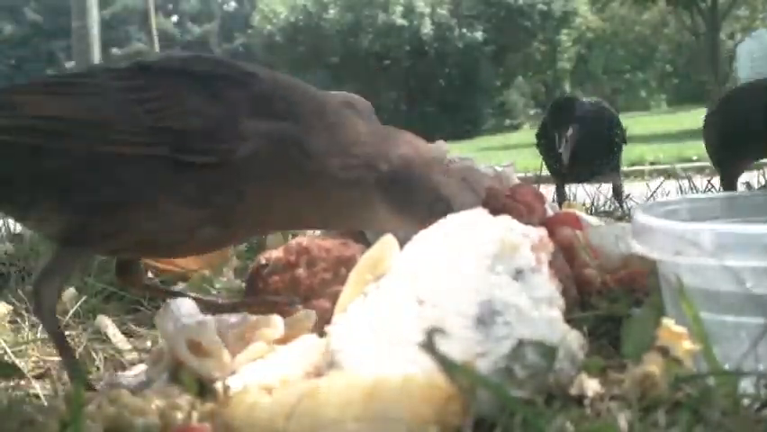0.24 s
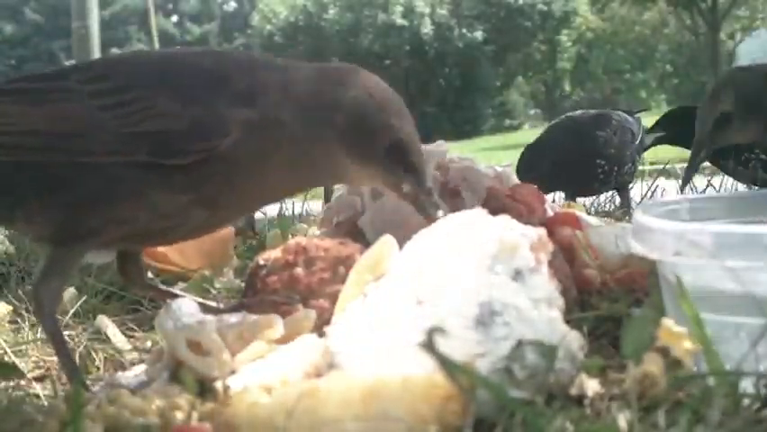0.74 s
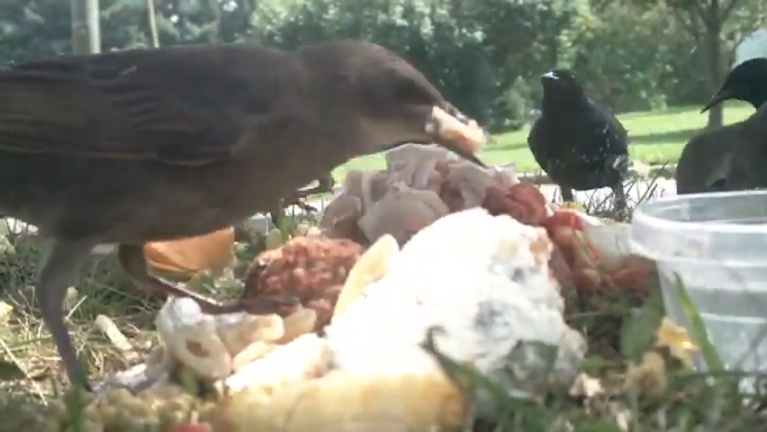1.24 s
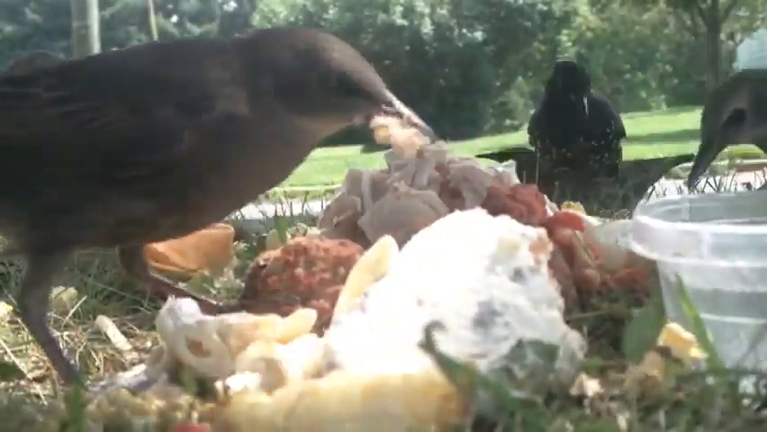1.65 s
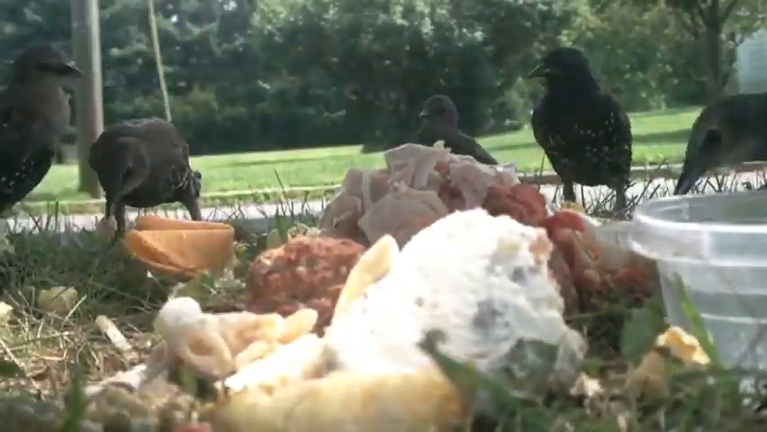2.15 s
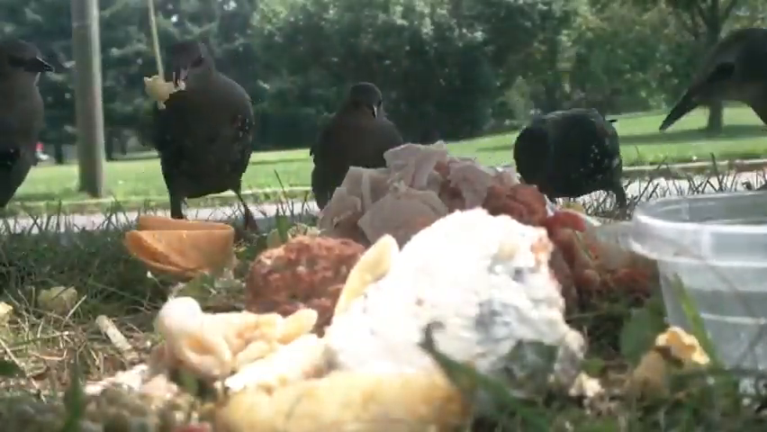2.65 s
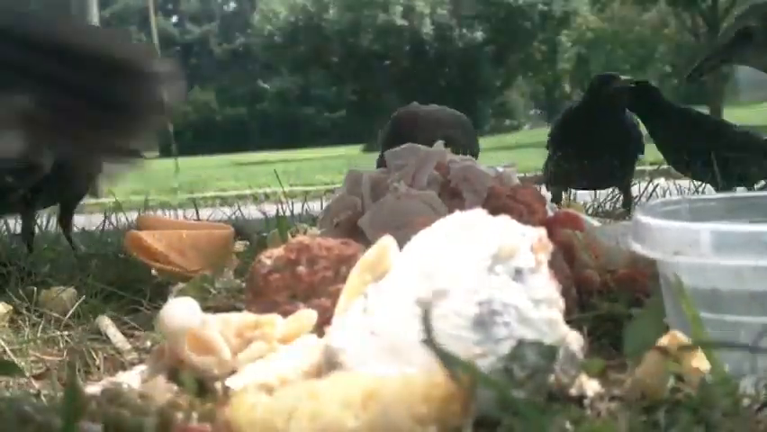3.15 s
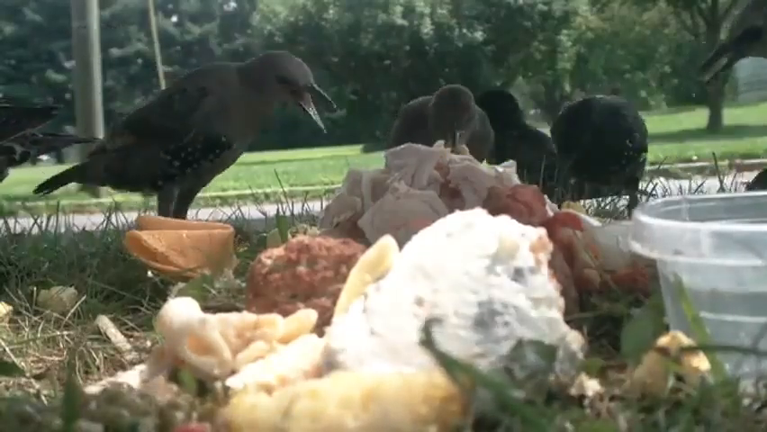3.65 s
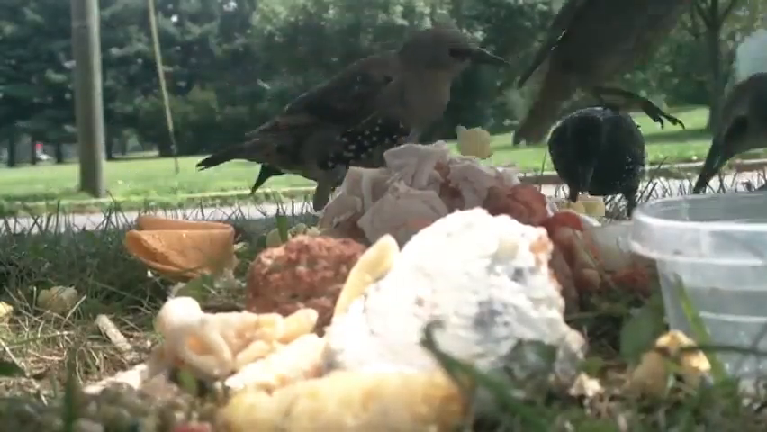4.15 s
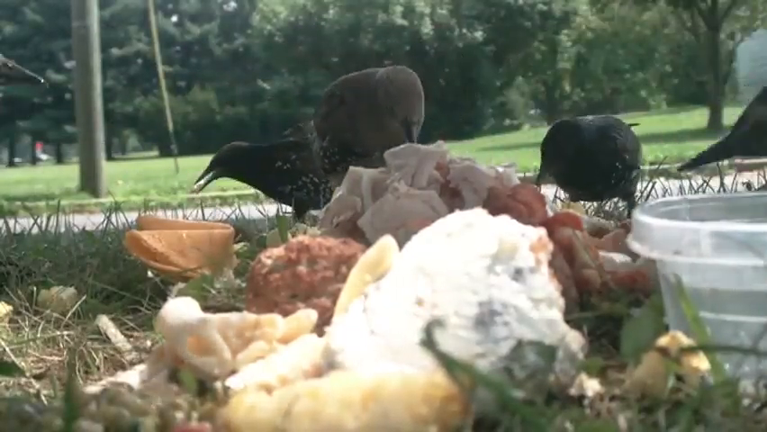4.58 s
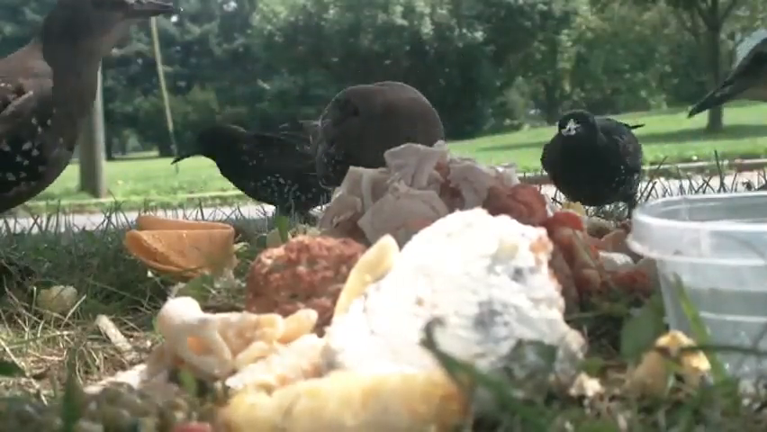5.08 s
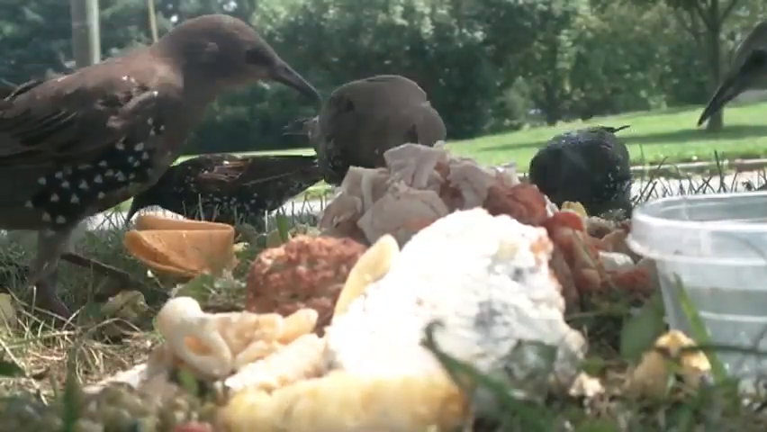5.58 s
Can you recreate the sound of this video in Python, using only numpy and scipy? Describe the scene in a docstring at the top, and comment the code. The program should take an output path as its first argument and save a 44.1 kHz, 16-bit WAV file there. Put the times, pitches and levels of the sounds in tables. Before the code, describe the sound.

Low outdoor rumble, blustery wingbeats buffeting the microphone, then raspy bird squawks with snapping clicks, followed by softer churrs farther away.

```python
"""On a lawn, right in front of a small camera lying in the grass, starlings squabble over scraps.
Near birds squawk with two warbling voices and a rattle, one hisses, and bills snap as short rings and cracks.
Others further off churr on duller voices, and thin whistles glide in the distance.
Wing strokes and gusts blow on the microphone, feathers and grass rustle as uneven noise, and birds leave
short tails of scattered sound. Steady noise, strongest in the bass, is the open air."""
import sys
import numpy as np
from scipy import signal
from scipy.fft import rfft, irfft, next_fast_len
from scipy.io import wavfile
from scipy.ndimage import uniform_filter1d, map_coordinates

SR = 44100
rng = np.random.default_rng(int(sys.argv[2]) if len(sys.argv) > 2 else 0)


def inscribe(sig):
    """Save sig as 16-bit PCM at rate SR to the path in sys.argv[1].

    A 1-D sig is mono; a 2-D sig holds one channel per row.
    Samples are clipped to [-1, 1] before scaling.
    """
    pcm = np.round(np.clip(np.atleast_2d(sig).T, -1, 1) * 32767)
    wavfile.write(sys.argv[1], SR, pcm.astype(np.int16))


N = 256662
TIME = np.arange(N) / SR


def from_db(db):
    """Decibels to an amplitude factor."""
    return 10 ** (np.asarray(db) / 20)


def rms_one(x):
    """Scale to an overall rms of 1."""
    return x / np.sqrt(np.mean(x ** 2) + 1e-20)


def even(x):
    """Hold the short-term level at 1."""
    return x / np.sqrt(np.maximum(uniform_filter1d(x ** 2, size=300), 1e-12))


def at_hz(points, hz):
    """Read a curve on a log-frequency axis."""
    f, value = np.transpose(points)
    return np.interp(np.log(hz + 1e-9), np.log(f), value)


def colour(x, spectrum):
    """Filter by a smooth spectrum of (hz, gain_db) points."""
    size = next_fast_len(x.shape[-1] + SR // 10, real=True)
    gain = from_db(at_hz(spectrum, np.fft.rfftfreq(size, 1 / SR)))
    return irfft(rfft(x, size) * gain, size)[..., :x.shape[-1]]


def drift(rate, size):
    """Smooth chance of spread about 1, with a fresh random point rate times a second."""
    knots = rng.standard_normal(8000)
    return map_coordinates(knots, [np.arange(size) * rate / SR], order=2, mode="wrap")


def envelope(t, attack_s, fade_db, release_s):
    """A call opens, sags ever faster as the air runs out, and closes; a negative fade swells."""
    gate = np.clip(t / attack_s, 0, 1) * np.clip((t[-1] - t) / release_s, 0, 1)
    return gate * from_db(-fade_db * (t / t[-1]) ** 1.88)


def puff(s, swell_s):
    """A push of air peaks after swell_s and dies away a few times more slowly."""
    u = np.clip((TIME - s) / swell_s, 0, 20)
    return u * np.exp(1 - u)


PORT_SPACING_M = 0.018


def placed(x, s, degrees):
    """A sound that starts at s; from the right it reaches the left port later."""
    lag = PORT_SPACING_M * np.sin(np.radians(degrees)) / 343 * SR   # in samples; sound travels 343 m/s
    out, start = np.zeros((2, N + SR)), round(s * SR)
    left = map_coordinates(x, [np.arange(len(x)) - lag], order=3)
    out[:, start:start + len(x)] = left, x
    return out[:, :N]


def at_ports(x):
    """Each port tints the sound, the right one duller around 6.5 kHz."""
    left = colour(x[0], [(3000, 0.034), (6500, 0.41), (9000, 1.7)])
    right = colour(x[1], [(3000, -0.5), (6500, -3.0), (9000, 1.3)])
    return np.array([left, right])


# How alike the two ports hear sound from all around: hz [Hz], likeness [correlation, 1 = identical]
PORT_LIKENESS = [(30, 0.95), (80, 0.86), (250, 0.85), (600, 0.66), (1500, 0.65), (4000, 0.11),
                 (9000, 0.029), (15000, 0.03)]


def diffuse_noise(spectrum):
    """Stereo noise from all around, less alike between the ports in the treble; rms 1."""
    alike = np.clip(at_hz(PORT_LIKENESS, np.fft.rfftfreq(N, 1 / SR)), -1, 1)
    mid, side = rfft(rng.standard_normal((2, N)))
    shared, opposed = np.sqrt(1 + alike) * mid, np.sqrt(1 - alike) * side * [[1], [-1]]
    return rms_one(colour(irfft(shared + opposed, N), spectrum))


# Colour of the open air, a low rumble under faint hiss: hz [Hz], gain_db [dB]
AIR_COLOUR = [(12, -8), (20, -3), (53, 1), (112, -5), (140, -8), (161, -11), (225, -14.5), (342, -19),
              (427, -22.5), (465, -23), (1100, -30.5), (1580, -32), (2760, -36.5), (3960, -38),
              (15500, -40.5)]
AIR_DB = -36.5


def open_air():
    """Steady diffuse noise rumbles low, a touch louder on the left."""
    return from_db(AIR_DB) * diffuse_noise(AIR_COLOUR) * from_db([[.5], [-.5]])


def garden(x, wet_db, t60):
    """Ground, tub and trees scatter a faint short tail, different at each port."""
    t = np.arange(SR // 2) / SR
    decay = from_db(-60 * t / t60) * (t > .002)   # nothing returns in the first 2 ms
    tail = colour(rng.standard_normal((2, len(t))), [(1000, -2), (5000, 10), (12000, -7.0)]) * decay
    tail = tail / np.sqrt(np.sum(tail ** 2) / 2)
    return from_db(wet_db) * signal.fftconvolve(x[None], tail, axes=1)[:, :N]


# Bouts of feathers and grass brushing: middle_s [s], half_length_s [s], level_db [dB]
BRUSH_BOUTS = [(.02, 0.16, -51.5), (0.716, 0.015, -45), (1.056, 0.24, -48.5), (1.3, 0.12, -44),
               (1.95, 0.57, -50), (3.024, 0.11, -38.5), (3.145, 0.013, -38), (3.45, 0.79, -53),
               (5.8, .3, -51)]
# Colour of brushing feathers and grass: hz [Hz], gain_db [dB]
FEATHER_COLOUR = [(200, 7), (400, 9.5), (800, 0), (1500, -3.5), (3000, -0.5), (6000, -4), (10000, -2),
                  (14000, -4), (16000, -6.5)]
STIRRING_DB = -56   # the flock is never quite still


def rustle(grain_db):
    """Feathers and grass blades brush in tiny uneven bursts; each bout swells and fades."""
    power = from_db(STIRRING_DB) ** 2
    for s, half, level_db in BRUSH_BOUTS:
        power = power + from_db(level_db) ** 2 * np.exp(-2 * ((TIME - s) / half) ** 2)
    noise = diffuse_noise(FEATHER_COLOUR)
    grain = rms_one(from_db(grain_db * drift(500, N) + drift(50, N)))
    return np.sqrt(power) * noise * grain


# Quick flicks of head and feathers: start_s [s], level_db [dB]
FEATHER_FLICKS = [(1.118, -36.5), (1.135, -37.5), (1.186, -34), (1.206, -37), (1.247, -32.5),
                  (1.273, -39.5), (1.311, -33), (1.375, -37), (2.958, -38), (2.973, -31), (2.983, -33.5)]
# Dull colour of a flick: hz [Hz], gain_db [dB]
FLICK_COLOUR = [(100, 3), (300, 10), (700, 2), (1200, -14.5), (3000, -10), (8000, -24), (15000, -40)]


def flicks(swell_s):
    """Short puffs of dull noise swell and die within some milliseconds."""
    level = sum(from_db(level_db) * puff(s, swell_s) for s, level_db in FEATHER_FLICKS)
    return level * diffuse_noise(FLICK_COLOUR)


# Gusts of turbulent air behind the wings: start_s [s], swell_s [s], level_db [dB], eddy_hz [Hz]
WING_GUSTS = [(.98, 0.031, -26, 83), (1.15, 0.066, -30.5, 225), (1.28, 0.017, -27, 207),
              (1.36, 0.017, -27.5, 140), (1.7, 0.02, -9.5, 243), (1.775, 0.019, -8.5, 218),
              (1.835, 0.016, -9.5, 162), (1.917, 0.01, -13, 135), (1.95, 0.027, -27.5, 95.5),
              (2.04, 0.056, -23.5, 72), (2.87, 0.1, -29, 110), (3.122, 0.011, -16.5, 211),
              (3.175, 0.016, -20.5, 85), (3.47, 0.023, -31.5, 60), (5.6, 0.13, -41.5, 200)]


def airflow():
    """Gusts add up in power, and the stronger ones weigh more in the eddy rate: (strength, eddy Hz)."""
    powers = np.array([(from_db(level_db) * puff(s, swell_s)) ** 2 + 1e-16
                       for s, swell_s, level_db, _ in WING_GUSTS])
    total = powers.sum(axis=0)
    return np.sqrt(total), np.array(WING_GUSTS)[:, -1] @ powers / total


def draught(steepness, rise, shared):
    """Eddies buffet each port as bands of low noise that weaken above the moving eddy rate."""
    strength, eddy_hz = airflow()
    out, edges = 0, 22 * 2 ** np.arange(0, 6.5, .66)
    for low, high in zip(edges, edges[1:]):
        white = rng.standard_normal((2, N)) + shared * rng.standard_normal(N)
        band = signal.sosfilt(signal.butter(2, [low, high], "band", fs=SR, output="sos"), white)
        ratio = np.sqrt(low * high) / eddy_hz
        out = out + rms_one(band) * ratio ** rise / np.sqrt(1 + ratio ** steepness)
    out = signal.sosfilt(signal.butter(2, 450, fs=SR, output="sos"), out)
    return strength * out / np.sqrt(uniform_filter1d(np.mean(out ** 2, axis=0), size=1200))


# Wing strokes that push air on the microphone: middle_s [s], peak_db [dB],
# half_length_s [s, from the middle to either peak]
WING_STROKES = [(1.003, -25.5, 0.013), (2.089, -20.5, 0.0053), (2.929, -16, 0.0067), (3.006, -10, 0.0053),
                (3.084, -9.5, 0.0062), (3.163, -6.5, 0.0047)]


def wing_strokes():
    """A passing wing draws the air away and then pushes it back."""
    out = np.zeros(N)
    for s, peak_db, half in WING_STROKES:
        u = np.clip((TIME - s) / half, -10, 10)
        out += from_db(peak_db) * u * np.exp((1 - u * u) / 2)
    return out


# Thin distant whistles: start_s [s], length_s [s], start_hz [Hz], end_hz [Hz], level_db [dB]
THIN_WHISTLES = [(2.503, .18, 4150, 4130, -58), (4.286, 0.2, 4150, 4110, -60),
                 (4.658, .1, 1595, 1480, -54.5), (5.203, 0.11, 5240, 4930, -47),
                 (5.246, 0.19, 5050, 4730, -56)]


def whistles():
    """Thin gliding sines swell, waver and fade."""
    out = np.zeros(N)
    for s, length, start_hz, end_hz, level_db in THIN_WHISTLES:
        span = (TIME >= s) & (TIME < s + length)
        along = (TIME[span] - s) / length
        hz = (start_hz + (end_hz - start_hz) * along) * (1 + 0.012 * drift(283, len(along)))
        level = from_db(level_db + 1.5 * drift(37, len(along))) * np.sin(np.pi * along)
        out[span] += level * np.sin(2 * np.pi * np.cumsum(hz) / SR)
    return out


def membrane(hz, slope_db):
    """One side of the syrinx: twelve harmonics that change by slope_db an octave."""
    k = np.arange(1, 13)[:, None]
    phase = 2 * np.pi * np.cumsum(hz) / SR
    level = from_db(slope_db * np.log2(k)) * (k * hz < SR / 2)
    return np.sum(level * np.sin(k * phase), axis=0)


def rattle(size, per_s, scatter, air):
    """Slack membranes slap at uneven intervals, with a little air rushing between the slaps."""
    turns = np.cumsum(per_s * np.exp(scatter * drift(900, size))) / SR
    slaps = np.diff(np.floor(turns), prepend=0) * from_db(3.5 * rng.standard_normal(size))
    return rms_one(slaps) + air * rng.standard_normal(size)


def call(upper_hz, lower_hz, rasp, throat, warble_hz, warble, throb_db, jitter, lower_db, slope_db, tilt_db=0):
    """Two warbling voices and a rattle share one throat; less rasp means less rattle and more tone."""
    size, rasp = len(upper_hz), np.clip(rasp, 0, 1)
    # an open bill facing this way is brighter
    throat = [(hz, db + tilt_db * np.log2(hz)) for hz, db in throat]
    swing = np.sin(2 * np.pi * np.cumsum(warble_hz * (1 + 0.111 * drift(40.2, size))) / SR)
    upper_bend = warble * swing + jitter * (0.43 + rasp) * drift(691, size)
    upper = membrane(upper_hz * (1 + upper_bend), slope_db)
    lower_bend = warble * swing * (1 - rasp) + jitter * (0.49 + rasp) * drift(704, size)
    lower = membrane(lower_hz * (1 + lower_bend), slope_db + 2)
    # the slack side comes and goes, and rests in pure notes
    lower = lower * from_db(lower_db + 3.6 * drift(119.3, size)) * np.tanh(3 * rasp)
    tone = even(colour(upper + lower, throat)) * from_db(2.04 * drift(303.7, size))
    noise = even(colour(rattle(size, per_s=750, scatter=.35, air=0.85), throat))
    mix = np.sqrt(1 - rasp) * tone + np.sqrt(rasp) * noise
    return from_db(throb_db * swing) * mix   # louder at the top of each warble


# Churrs further off: start_s [s], length_s [s], from_hz [Hz], to_hz [Hz],
# lower_share [lower pitch / upper pitch], level_db [dB], fade_db [dB], rasp [0-1]
FAR_CHURRS = [ (1.926, 0.18, 2553, 2470, 0.93, -45.5, -0.5, 0.16),
              (2.924, 0.2, 1850, 2822, 0.79, -37.5, 8.5, 0.43),
              (3.153, 0.084, 1046, 2310, .63, -36, 16.5, 0.5),
              (3.215, 0.15, 2450, 2580, 0.66, -41.5, 20, 0.8),
              (4.434, .195, 2467, 2040, .62, -37.5, 7.5, .22),
              (5.013, 0.21, 1738, 2840, 0.77, -35, 11.5, 0.33),
              (5.455, 0.16, 848, 2697, 0.56, -48, -2, 0.5), (5.674, 0.15, 1890, 3050, .83, -43.5, 1, 0.72)]
# Colour of the far throats: hz [Hz], gain_db [dB]
FAR_THROAT_COLOUR = [(300, -52), (700, -9), (1400, 1.5), (2300, 3.5), (3000, 1), (4000, -7), (6000, -11),
                     (12000, -20)]
CHURR_ATTACK_S, CHURR_RELEASE_S, FAR_DEGREES = 0.05, 0.022, 28
CHURR_ARCH = .05   # a churr bows upward in the middle by this share of its pitch
CHURR_SETTLE, SETTLE_BEND = .65, 4   # towards its end it loses this share of its warble and rasp


def far_birds():
    """Duller churrs with a slow wide warble; each glides in a low arch and settles into a plainer note."""
    out = 0
    for s, length, from_hz, to_hz, lower_share, level_db, fade_db, rasp in FAR_CHURRS:
        t = np.arange(round(length * SR)) / SR
        hz = np.linspace(from_hz, to_hz, len(t)) * (1 + CHURR_ARCH * np.sin(np.pi * t / length))
        unrest = 1 - CHURR_SETTLE * (t / length) ** SETTLE_BEND
        voice = call(hz, lower_share * hz, rasp * unrest, FAR_THROAT_COLOUR, warble_hz=59.75,
                     warble=0.151 * unrest, throb_db=0.5, jitter=0.029, lower_db=0.0, slope_db=-30)
        shape = from_db(level_db) * envelope(t, CHURR_ATTACK_S, fade_db, CHURR_RELEASE_S)
        out = out + placed(shape * voice, s, FAR_DEGREES)
    return out


# Colour of the hoarse hiss: hz [Hz], gain_db [dB]
HOARSE_COLOUR = [(290, -45), (500, -18), (674, 0.5), (1540, -8), (4470, 0.5), (6760, -3.5), (7790, -9),
                 (9380, -7), (13600, -27), (15000, -32)]
HISS_S, HISS_LENGTH_S, HISS_ATTACK_S, HISS_RELEASE_S = 2.902, 0.059, 0.013, 0.013
HISS_DB, HISS_FADE_DB, HISS_DEGREES = -27.5, 3.5, 24


def hiss():
    """One bird's hoarse hiss: rattle and air without a tone."""
    t = np.arange(round(HISS_LENGTH_S * SR)) / SR
    noise = rms_one(colour(rattle(len(t), per_s=500, scatter=.4, air=0.7), HOARSE_COLOUR))
    shape = from_db(HISS_DB) * envelope(t, HISS_ATTACK_S, HISS_FADE_DB, HISS_RELEASE_S)
    return placed(shape * noise, HISS_S, HISS_DEGREES)


# Sharp snaps of bill and throat: start_s [s], level_db [dB], ring_hz [Hz]
BILL_SNAPS = [(0.1424, -6.5, 6600), (.354, -35.5, 2200), (.716, -35, 6100), (1.785, -40, 2900),
              (2.2081, -25, 5500), (2.305, -3.5, 6100), (2.367, 2, 6400), (2.3747, -7, 6000),
              (2.4411, 0.5, 5600), (2.703, -29.5, 12000), (2.745, -31, 11000), (2.982, -30, 3000),
              (3.526, -8.5, 4950), (3.6002, -4.5, 5830), (3.671, -15.5, 6300), (3.6752, -11.5, 6240),
              (3.681, -11, 5900), (3.6874, -3.5, 6400), (3.9298, -6, 5300), (3.9347, -4, 5070),
              (3.995, -21, 5070), (4.78, -33, 5030), (5.347, -32, 5530)]
# Colour of the near throats, for snaps and squawks: hz [Hz], gain_db [dB]
NEAR_THROAT_COLOUR = [(300, -34), (750, -15.5), (1400, -14.5), (2400, -12.5), (3400, -5), (4400, -3),
                      (5600, 2), (7100, -2), (8300, -10.5), (9800, -10.5), (11500, -19.5), (13500, -11.5),
                      (16000, -29)]
SNAP_DEGREES = 14


def snaps(swell_s, crack_db, crack_s):
    """Each snap rings the bill cavity for a few cycles over a short crack coloured by the throat."""
    rings, cracks, t = np.zeros(N), np.zeros(N), np.arange(400) / SR
    for s, level_db, hz in BILL_SNAPS:
        at = round(s * SR) + np.arange(len(t))
        swell = t / swell_s * np.exp(1 - t / swell_s)
        rings[at] += from_db(level_db) * swell * np.sin(2 * np.pi * hz * t)
        cracks[at] += from_db(level_db + crack_db) * rng.standard_normal(len(t)) * np.exp(-t / crack_s)
    rings = colour(rings, [(1000, 5.5), (3000, 3.5), (7500, -0.5), (11000, -2.0)])
    return rings + colour(cracks, NEAR_THROAT_COLOUR)


# Near squawks: start_s [s], length_s [s], attack_s [s], glide_s [s], upper_from_hz [Hz], upper_to_hz [Hz],
# lower_from_hz [Hz], lower_to_hz [Hz], level_db [dB], fade_db [dB], rasp_from [0-1], rasp_to [0-1, once tight],
# warble [share of pitch], tilt_db [dB per octave, brightness], degrees [degrees to the right]
NEAR_SQUAWKS = [ (2.22, 0.14, 0.021, .140, 1950, 4450, 747, 3597, -16, 6, 0.46, 0.1, 0.066, 2.0, 23),
                (2.369, .058, 0.0015, .023, 2700, 4750, 1152, 3260, -17, 4, 0.9, .04, 0.059, 2.2, 30),
                (2.43, .069, 0.0061, 0.033, 1750, 4235, 778, 2795, -18, 17, 0.76, 0.13, 0.1, 0, 29),
                (3.449, 0.095, 0.014, 0.058, 1300, 3930, 657, 2090, -32, 10.5, 0.56, 0.57, 0.056, -4, 46),
                (3.525, 0.079, 0.0086, 0.047, 1500, 4250, 723, 2440, -20.5, 7.5, 0.94, 0.15, 0.15, -1.5, 6),
                (3.599, 0.031, 0.014, 0.031, 3750, 5260, 2390, 2890, -20, -0.5, 0.33, 0, 0.049, 1.5, 11),
                (3.626, 0.043, 0.0034, 0.032, 3400, 2840, 2360, 1950, -33.5, 11, 0.48, 0.2, .02, -3.5, 13),
                (3.678, 0.038, .008, .022, 2030, 4300, 810, 2030, -22, 20, 1, 1, 0.044, -2.5, 18),
                (3.775, 0.1, 0.0096, .072, 1250, 4080, 721, 2130, -33.5, 20, 0.55, 0.3, 0.044, -7, 88),
                (3.879, 0.037, .005, 0.011, 4000, 4300, 2400, 2420, -40.5, 4, 0.6, 0.14, .03, -6, 72),
                (3.913, 0.026, 0.024, 0.02, 1300, 2500, 657, 1265, -21, -4.5, 0.6, 0.9, .02, -1.5, 7),
                (3.934, 0.046, 0.0045, .017, 1950, 3346, 981, 1900, -16, 22, 0.19, 0.17, 0.088, -1, 6.1),
                (3.974, 0.041, .004, .038, 2850, 2310, 1840, 1700, -35.5, 7, 0.12, 0.17, .06, -5, 7)]
# A tighter membrane sings purer: pitch_hz [Hz], slope_db [dB per octave of overtones]
OVERTONE_FALL = [(3200, -3), (4800, -5)]
SQUAWK_RELEASE_S = 0.0028
WANDER = .055   # each side strays from its glide by this share at middling rasp, more when raspier


def near_birds():
    """Close squawks with a very fast warble: as the syrinx tightens, both voices glide and the rasp shifts."""
    out = 0
    for (s, length, attack, glide, upper_from, upper_to, lower_from, lower_to, level_db, fade_db,
         rasp_from, rasp_to, warble, tilt_db, degrees) in NEAR_SQUAWKS:
        t = np.arange(round(length * SR)) / SR
        tension = np.minimum(t / glide, 1)
        rasp = rasp_from + (rasp_to - rasp_from) * tension
        stray = WANDER * (.5 + rasp)
        upper_hz = upper_from * (upper_to / upper_from) ** tension * (1 + stray * drift(130.9, len(t)))
        lower_hz = lower_from * (lower_to / lower_from) ** tension * (1 + stray * drift(110, len(t)))
        voice = call(upper_hz, lower_hz, rasp, NEAR_THROAT_COLOUR, warble_hz=94.4, warble=warble,
                     throb_db=0.1, jitter=0.027, lower_db=-0.5,
                     slope_db=at_hz(OVERTONE_FALL, upper_hz), tilt_db=tilt_db)
        shape = from_db(level_db) * envelope(t, attack, fade_db, SQUAWK_RELEASE_S)
        out = out + placed(shape * voice, s, degrees)
    return out


def scene():
    """Open air, feathers, wings and birds together."""
    feathers = rustle(grain_db=3.0) + flicks(swell_s=0.0036)
    gusts = draught(steepness=7.6, rise=0.11, shared=0.55) * from_db([[1], [-.5]])
    wings = wing_strokes() + gusts
    far = far_birds() + placed(whistles(), 0, FAR_DEGREES)
    clacks = snaps(swell_s=.00012, crack_db=-7, crack_s=.0008)
    near = near_birds() + hiss() + placed(clacks, 0, SNAP_DEGREES)
    birds = at_ports(near + far)
    near_tails = garden(near[1], wet_db=-32.0, t60=0.086) + garden(near[1], wet_db=-27.0, t60=0.33)
    far_tail = garden(far[1], wet_db=-11, t60=.14)
    return open_air() + feathers + wings + far_tail + near_tails + birds


CUTOFF_HZ = 15600


def record(dry):
    """The camera thins the deepest bass, has a narrow treble notch, rounds its peaks and cuts the top."""
    thinned = signal.sosfilt(signal.butter(1, 14, "high", fs=SR, output="sos"), dry)
    notched = signal.lfilter(*signal.iirnotch(7830, 14, fs=SR), thinned)
    rounded = notched / (1 + (notched / .78) ** 6) ** (1 / 6)   # peaks bend towards 0.78
    return signal.sosfilt(signal.ellip(10, .1, 90, CUTOFF_HZ, fs=SR, output="sos"), rounded)


dry = scene()
out = record(dry)
inscribe(out)
```